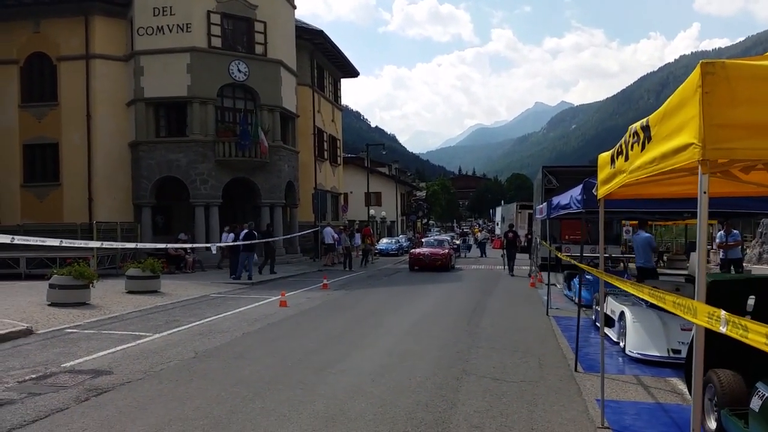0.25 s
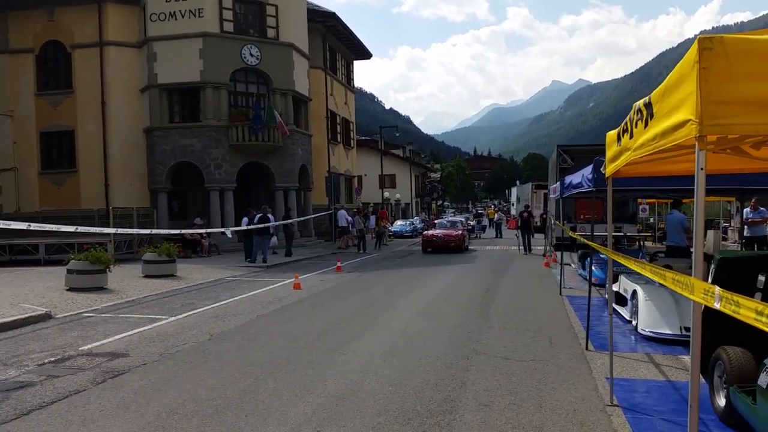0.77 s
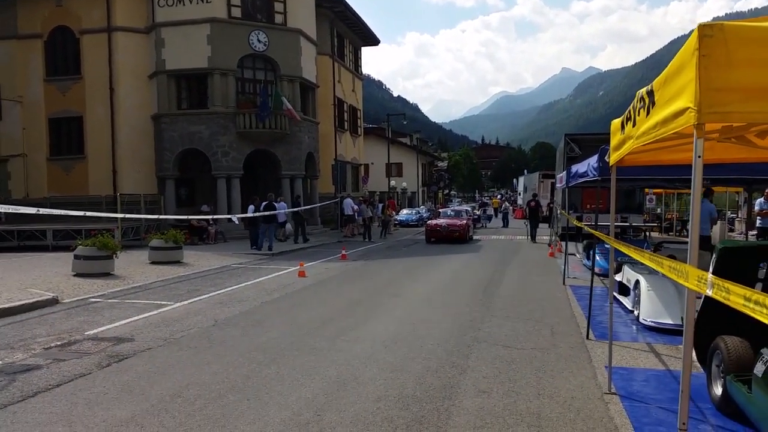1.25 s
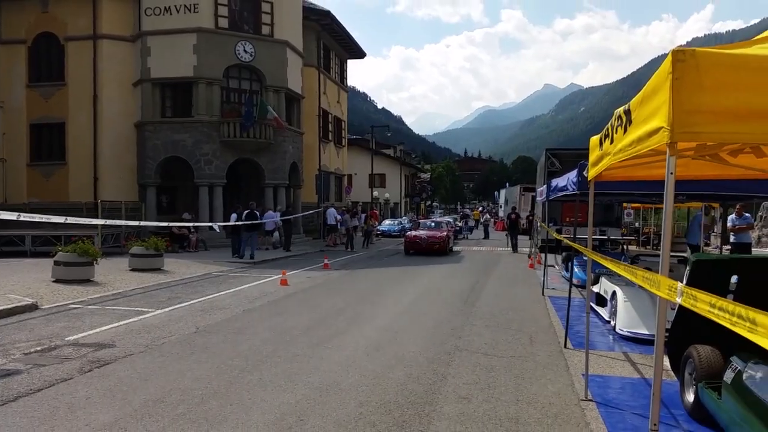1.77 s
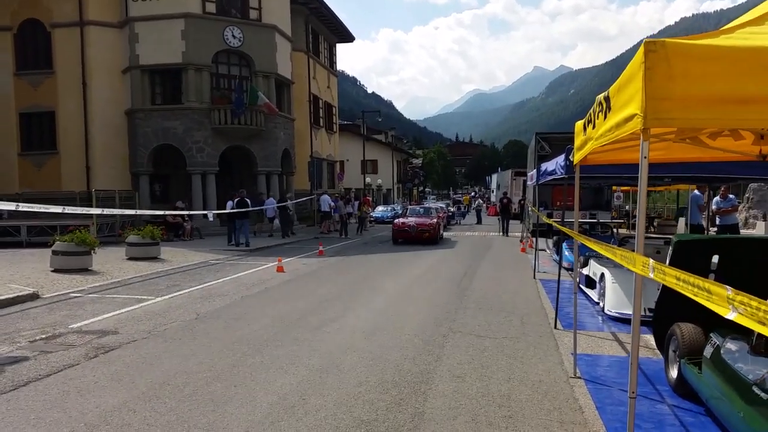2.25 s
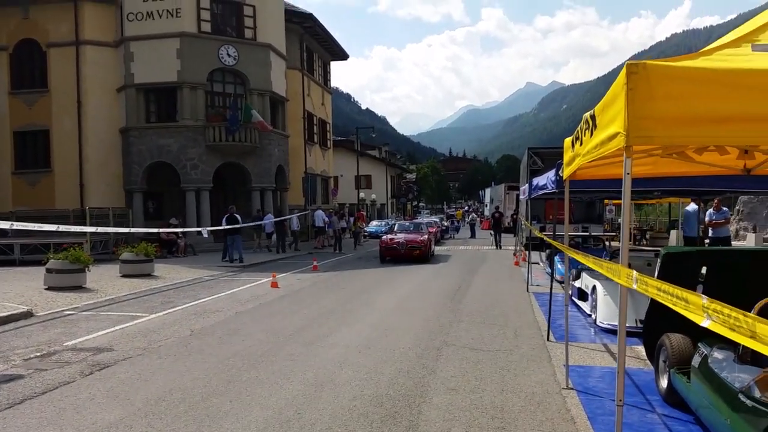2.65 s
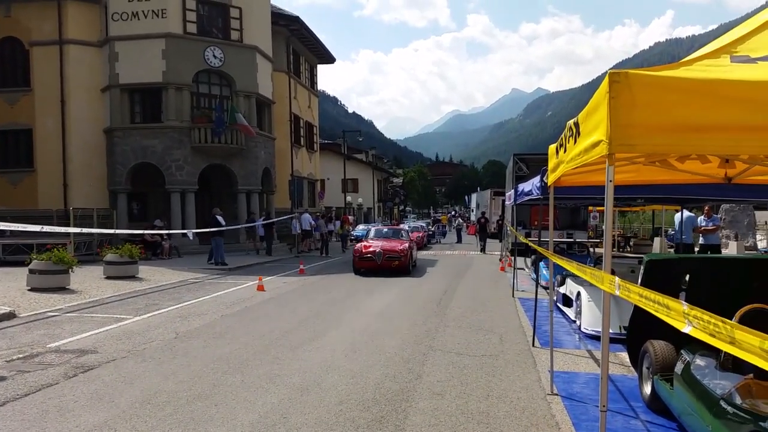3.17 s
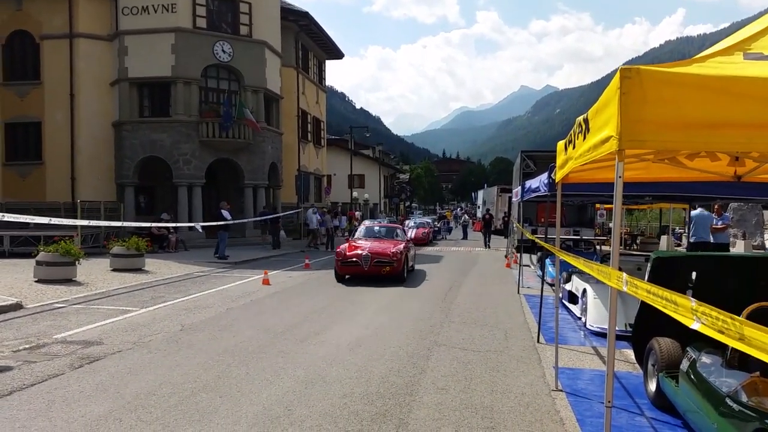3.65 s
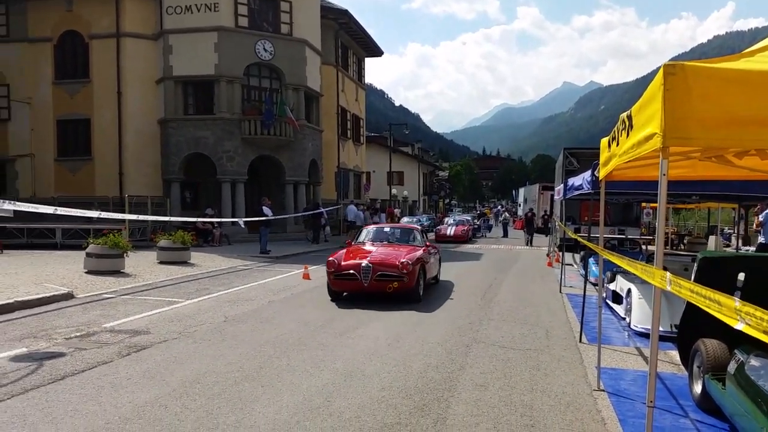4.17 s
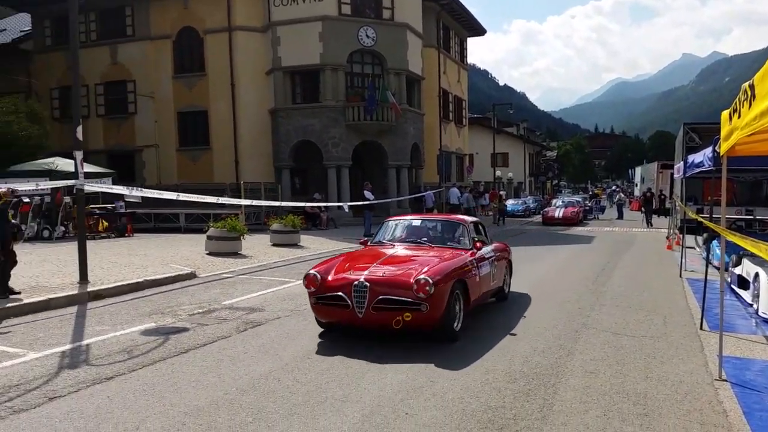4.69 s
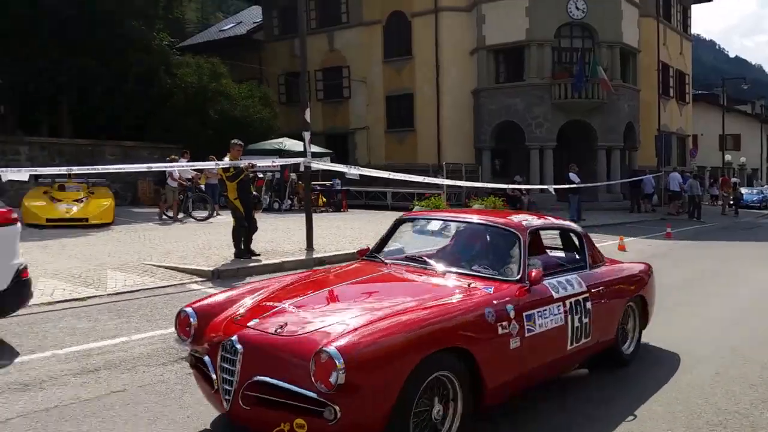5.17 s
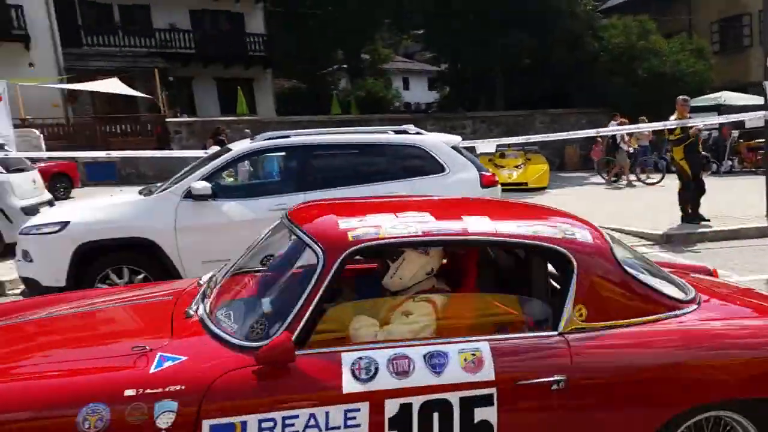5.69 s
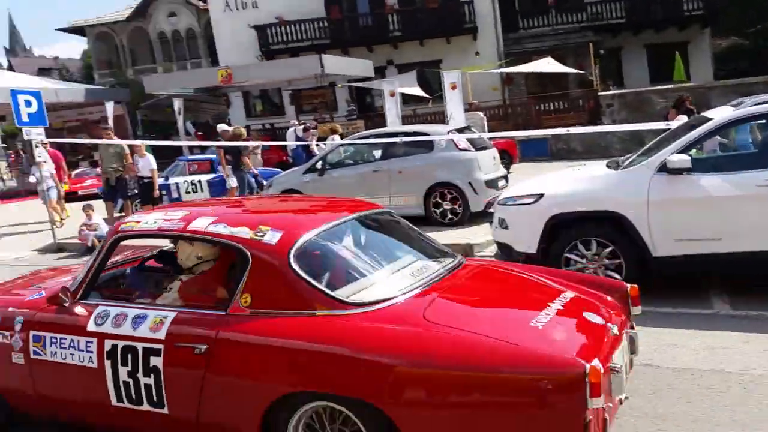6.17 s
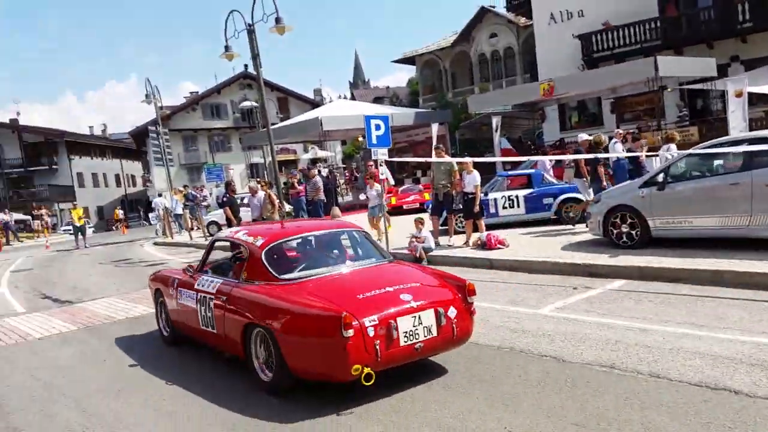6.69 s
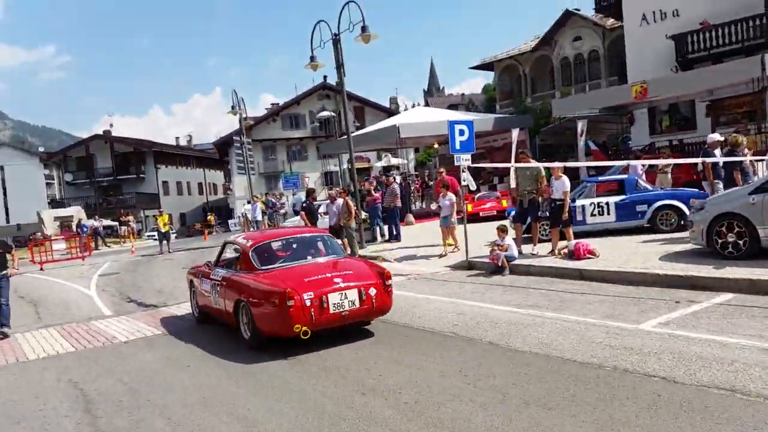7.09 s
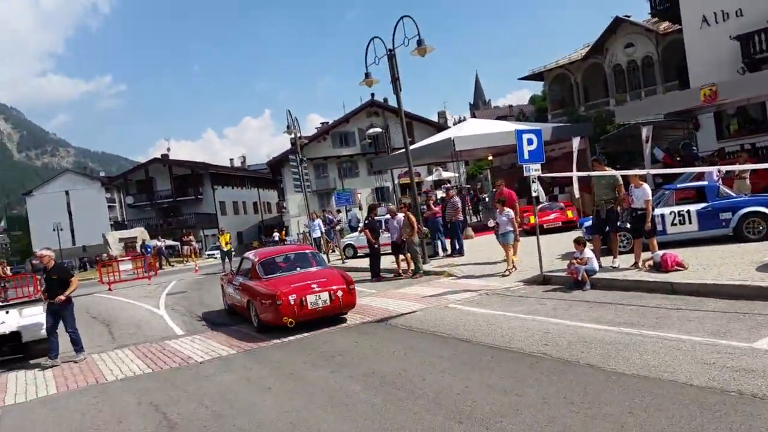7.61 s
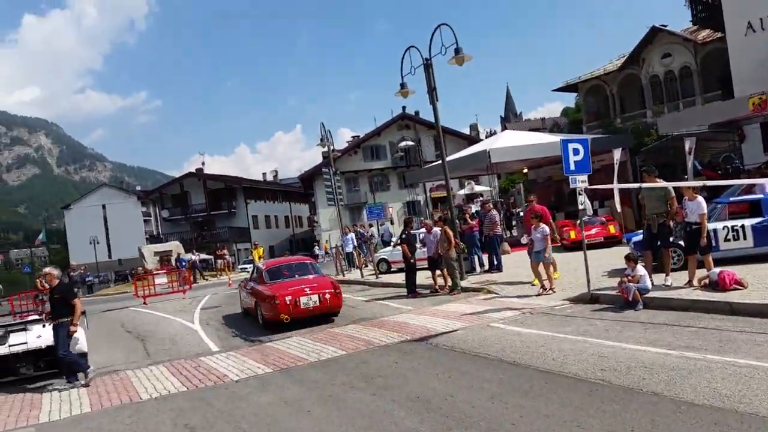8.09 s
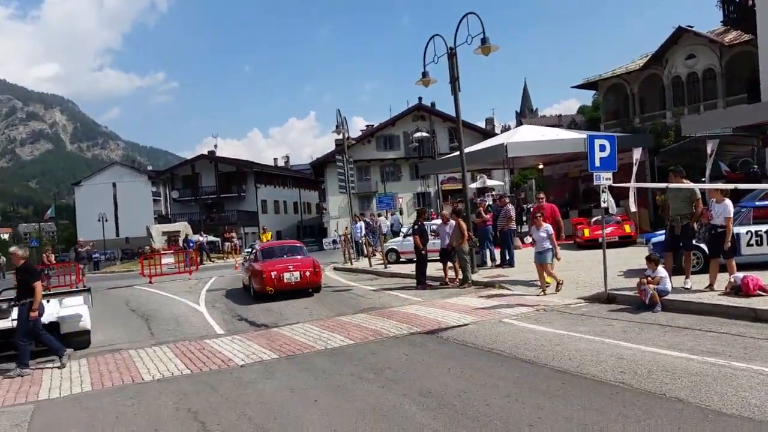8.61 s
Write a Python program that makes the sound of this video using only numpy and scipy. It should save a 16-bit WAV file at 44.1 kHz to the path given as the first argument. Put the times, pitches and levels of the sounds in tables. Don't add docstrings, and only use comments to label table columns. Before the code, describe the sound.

Lumpy engines rev up a village street, then a racing coupe revs twice, sweeps close past, blips and coasts off as brakes squeal briefly.

```python
import sys
import numpy as np
from scipy import signal
from scipy.fft import rfft, irfft, next_fast_len
from scipy.io import wavfile
from scipy.ndimage import uniform_filter1d

SR = 44100
rng = np.random.default_rng(int(sys.argv[2]) if len(sys.argv) > 2 else 0)


def log_audio(samples):
    frames = np.atleast_2d(samples).T
    limited = np.clip(frames, -1, 1)
    pcm = np.round(limited * 32767).astype(np.int16)
    wavfile.write(sys.argv[1], SR, pcm)


def attenuation_scalar(level_db):
    decades = np.asarray(level_db, float) / 20
    return 10 ** decades


N = 390285
TIME = np.arange(N) / SR
PADDED = next_fast_len(N + SR // 10)
FREQ = np.maximum(np.fft.rfftfreq(PADDED, 1 / SR), 1)

# time in seconds, cycle rate in Hz, level in dB,
# dulling in dB per octave of order.
QUEUE_EARLY = [
    (0.0, 21.12, -19.5, -6.5),
    (0.12, 21.43, -21, -3.5),
    (0.274, 21.96, -29, 0.5),
    (0.73, 28.27, -19.5, 3.5),
    (1.0, 28.18, -23.5, -2.5),
    (1.144, 26.39, -26, 2),
    (1.3, 27.77, -17.5, 0.5),
]
QUEUE_LATE = [
    (7.7, 26.18, -35.5, -1.5),
    (7.87, 24.94, -23, 0.5),
    (8.048, 24.45, -19.5, -2),
    (8.262, 26.6, -17, 2.5),
    (8.49, 29.11, -15, -0.5),
    (8.704, 29.7, -15, 3),
    (8.85, 28.8, -17, -3),
]
# multiple of the cycle rate, level in dB.
LUMPY_ORDERS = [(2, -13.5), (3, -4.5), (4, -1.5), (5, -8), (6, -4), (7, -14), (8, -5.5), (10, -9.5)]
SILENCER_HZ, SILENCER_DB_PER_HZ = 227, 0.5

# time in seconds, engine effort in dB, nearness of rolling cars in dB.
STREET = [(0, -28, -51.5), (.35, -29, -54), (.9, -26, -50), (1.5, -24, -49), (2.1, -25, -50.5),
          (2.75, -21.5, -51), (3.5, -24, -48), (4.2, -24.5, -46), (5.25, -30, -43), (5.9, -35.5, -47.5),
          (6.38, -37.5, -54), (6.7, -29.5, -61), (6.9, -34, -58.5), (7.45, -39.5, -67), (7.7, -37, -66.5),
          (8.2, -32, -62.5), (8.7, -29.5, -52.5), (8.85, -29, -51)]
# time in seconds, level in dB.
BURBLE_LEVEL = [(.5, -21), (.9, -18), (1.15, -20), (1.4, -24), (2.2, -23), (2.5, -18), (3.15, -18),
                (3.4, -23), (4.4, -28), (5.4, -29), (5.6, -18), (6.2, -22), (6.45, -29), (7.4, -33),
                (7.8, -28)]
# frequency in Hz, level in dB per Hz.
BURBLE_TONE = [(20, -25), (45, -10), (70, -2.5), (100, -4), (150, -3), (200, -4.5), (260, -14), (330, -39)]
GAS_TONE = [(200, 8.5), (260, -0.5), (320, 1.5), (390, -1.5), (490, -2.5), (560, -2.5), (650, -1),
            (760, -7.5), (900, -16.5), (1000, -30)]
CLATTER_TONE = [(800, -18.5), (920, -10.5), (1070, -0.5), (1200, -5), (1420, -11.5), (1650, -10),
                (1850, -10.5), (2150, -13), (2370, -14), (2560, -18), (2900, -21), (3300, -29.5)]
SHIELD_TONE = [(2180, -18), (2370, 0), (2560, -18)]
HISS_TONE = [(1650, -29.5), (2800, -9.5), (3570, -2), (3900, -2.5), (4820, -5.5), (6030, -4.5), (6880, -10),
             (9000, -29.5), (11700, -56), (19800, -120)]
AIR_TONE = [(5290, -43.5), (9000, -17), (9590, -8.5), (11900, 4.5), (14000, -3), (15100, -5.5), (15700, -9)]
# centre in seconds, swell in dB, half width in seconds.
ROARS = [
    (.915, 9, 0.025),
    (.64, 4.5, 0.035),
    (1.62, 3.5, 0.044),
    (3.67, 6.5, 0.026),
    (1.8, 0.5, 0.039),
    (5.62, 3, 0.11),
]
# start in seconds, level in dB over the hiss.
TICKS = [
    (1.213, 12.5),
    (2.389, 8.5),
    (5.97, 8),
    (6.055, 7),
    (8.71, 13),
]
# frequency in Hz, correlation from 0 to 1.
LIKENESS = [(60, 0.34), (300, 0.77), (700, 0.76), (1500, 0.34), (3000, 0.26), (6000, 0.2), (10000, 0.092),
            (13500, 0.27)]
CLATTER_EFFORT, CLATTER_NEAR, CLATTER_DB, AIR_DB = 0.58, 0.41, -1.1, -4.5
SHIELD_DB, SHIELD_ENDS_S = -19.5, 4.2
TICK_S, FAN_DB_PER_OCTAVE = 0.0044, 1.5
AIR_FULL_DB, AIR_LOSS = -47.5, 1.7
PASS_S, PASS_TURN_S, BAY_SHADOW_DB, AIR_SHADOW_DB = 5.6, 0.21, -0.5, -6

# time in seconds, firing rate in Hz.
COUPE_SPEED = [(0.85, 55.8), (1.0, 69.5), (1.15, 78.0), (1.75, 87.9), (2.05, 80.9), (2.65, 60.0),
               (3.1, 71.3), (4.15, 96.4), (4.45, 100.4), (4.9, 102.0), (5.35, 100.8), (5.65, 97.5),
               (6.33, 88.4), (6.5, 92), (6.79, 113.6), (7.15, 87.1), (7.6, 59.5), (7.75, 55.8)]
# time in seconds,
# level in dB, dulling in dB per octave of order, intake note in dB.
COUPE_HEARD = [(.95, -3.5, 2.5, -47.5), (1.3, -2, -9.5, -45), (1.6, -1, -0.5, -39), (2.0, -0.5, 0, -41.5),
               (2.6, -6.5, 1.5, -26), (3.0, -6, 0, -42), (3.5, -0.5, 1.5, -34), (4.12, 0, 0.5, -32),
               (4.33, 2.5, -9, -27.5), (4.65, 1, 1, -36.5), (5.3, -1.5, 3, -35), (5.75, 2, -5, -58.5),
               (6.35, 3, -13, -58), (6.55, 1, 2, -31.5), (6.78, -2, 5.5, -32), (6.9, -7, -3.5, -57),
               (7.2, 1, -11, -64), (7.75, -9, -16.5, -63.5)]
# multiple of the firing rate, level in dB.
STRONG = [(1, 1), (1.5, -12), (2, 0), (3, -2), (4, -3.5)]
# multiple of the firing rate, level in dB under the gas.
FAINT = [(2.5, -4.5), (3.5, -17), (4.5, -18.5), (5, -19.5), (5.5, -14), (7, -11.5), (7.5, -19), (8, -15.5),
         (8.5, -19.5), (9, -21.5), (10, -21.5), (9.5, -26.5), (11, -28.5)]
# multiple of the firing rate, level in dB over the nearness,
# level in dB gained (negative: lost) once the car has gone by.
WHINES = [(6.5, 12.5, -12.5), (10.5, 2.5, -6.5), (11.5, -3, -9.5)]
# frequency in Hz, level in dB.
TAILPIPE = [(55, -27.5), (80, -14.5), (100, -12.5), (150, -10), (195, -15), (240, -25), (300, -29),
            (420, -44)]
# frequency in Hz, level in dB.
BONNET = [(400, -1), (490, 4.5), (570, -6.5), (680, 0.5), (880, -5.5), (1040, -1.5), (1160, -1),
          (1280, -10)]
MISFIRE = 0.6
SMOOTH_DB, ROUGH_SPAN_DB = -31, 7
WHINE_RISE, WHINE_NEAR_DB = 1, -43

# start in seconds, length in seconds, pitch in Hz, level in dB.
DRONE = (1.19, .38, 318, -26)

# start in seconds, length in seconds, level in dB,
# cracks per second.
CRACKS = [
    (6.344, .45, -74.5, 220),
    (6.83, 0.24, -74.5, 60),
    (7.297, .65, -78.5, 35),
    (8.201, 0.19, -67, 44),
    (8.57, .3, -67.5, 45),
]
# frequency in Hz, level in dB per Hz.
CRACK_TONE = [(7000, -36.5), (9000, -22.0), (11000, -10.0), (13500, -11.5), (15000, 0.5), (16500, -3)]

# start in seconds, peak in dB, length in seconds.
GRABS = [
    (7.4, -41.5, 0.054),
    (7.455, -42, 0.035),
    (7.969, -41.5, 0.041),
    (8.065, -37, 0.035),
    (8.083, -35.5, 0.049),
    (8.424, -20, 0.046),
    (8.473, -43, 0.041),
]
# time in seconds, pitch in Hz, level in dB.
SQUEAK = [
    (8.45, 2510, -62),
    (8.548, 2536, -40),
    (8.636, 2516, -48.5),
    (8.696, 2444, -57),
    (8.7, 2480, -47),
]
DISC_HZ = 13680

# frequency in Hz, left minus right in dB.
PORT_BALANCE = [(60, 2.0), (110, 3), (200, 4), (380, 4.0), (700, 6.5), (1290, 3.5), (2380, 3.5), (4400, 7),
                (8120, 5), (15000, -7.5)]
LATE_LAG = 22


def curves(table):
    s, *columns = np.transpose(table)
    inside = 1. * ((TIME >= s[0]) & (TIME <= s[-1]))
    gate = uniform_filter1d(inside, SR // 20, mode="nearest")
    return [np.interp(TIME, s, c) for c in columns] + [gate]


def across(table):
    hz, value = np.transpose(table)
    return np.interp(np.log(FREQ), np.log(hz), value)


def unit(x):
    return x / np.sqrt(np.mean(x ** 2))


def filtered(x, gain):
    return irfft(rfft(x, PADDED) * gain, PADDED)[..., :N]


def colour(x, table):
    inside = (FREQ > table[0][0]) * (FREQ < table[-1][0])
    return unit(filtered(x, attenuation_scalar(across(table)) * inside))


def walk(rate, at=TIME):
    k = 8
    steps = np.repeat(rng.standard_normal(int(N / SR * rate) + 2), k)
    slewed = uniform_filter1d(uniform_filter1d(steps, k), k)
    return np.interp(at * rate * k, np.arange(len(steps)), unit(slewed))


def firings(turns, pattern_db, scatter_db, jitter):
    whole = np.arange(1, int(turns[-1]))
    chance = rng.standard_normal((N // 100, 2))[whole]
    at = np.clip(np.interp(whole + jitter * chance[:, 0], turns, np.arange(N)), 0, N - 2)
    size = attenuation_scalar(np.array(pattern_db)[whole % len(pattern_db)] + scatter_db * chance[:, 1])
    first = at.astype(int)
    part = at - first
    return np.bincount(first, size * (1 - part), N) + np.bincount(first + 1, size * part, N)


def tones(turns, orders, levels_db, phases, flicker_db, wobble):
    step = 10
    at = TIME[::step]
    angle = 2 * np.pi * (turns[::step] + wobble * walk(22, at))
    coarse = 0
    for k, db, phase in zip(orders, levels_db, phases):
        coarse = coarse + attenuation_scalar(db[::step] + flicker_db * walk(25, at)) * np.cos(k * angle + phase)
    return np.sqrt(2) * signal.resample_poly(coarse, step, 1)[:N]


def echo(x, t60_s):
    t = TIME[:SR // 2]
    tail = rng.standard_normal(len(t)) * np.exp(-np.log(1000) * t / t60_s)
    return signal.fftconvolve(x, tail / np.sqrt(np.sum(tail ** 2)))[:N]


def gone():
    return (1 + np.tanh((TIME - PASS_S) / PASS_TURN_S)) / 2


def swell(s, length_s):
    return np.sin(np.pi * np.clip((TIME - s) / length_s, 0, 1))


def lumpy(table):
    hz, level_db, dull_db, gate = curves(table)
    turns = np.cumsum(uniform_filter1d(hz, SR // 10)) / SR
    orders = np.array(LUMPY_ORDERS)[:, 0]
    pair = np.angle(1 + 0.8 * np.exp(-2j * np.pi * orders * 0.36))
    levels_db = []
    for k, db in LUMPY_ORDERS:
        silenced_db = SILENCER_DB_PER_HZ * np.maximum(k * hz - SILENCER_HZ, 0)
        levels_db.append(level_db + db + dull_db * np.log2(k / 4) + 2.1 * walk(11) - silenced_db)
    return gate * tones(turns, orders, levels_db, pair - np.pi / 4, flicker_db=0.6 * 2, wobble=0.003)


def street(turns):
    effort_db, near_db, _ = curves(STREET)
    passed = gone()
    air_near_db = np.minimum(near_db, AIR_FULL_DB)
    speed_octaves = np.log2(np.gradient(turns) * SR / 100)
    fan_db = FAN_DB_PER_OCTAVE * speed_octaves + AIR_LOSS * (air_near_db - AIR_FULL_DB)
    tick_db = sum(db * (TIME > s) * np.exp(-np.abs(TIME - s) / TICK_S) for s, db in TICKS)
    roar_db = sum(db * np.exp(-((TIME - s) / width_s) ** 4) for s, db, width_s in ROARS)

    idle = firings(np.cumsum(55 + 8 * walk(2)) / SR, [0, -3], scatter_db=3.5, jitter=0.299)
    burble = colour(echo(idle, 0.56), BURBLE_TONE) * attenuation_scalar(curves(BURBLE_LEVEL)[0])

    alike = np.clip(across(LIKENESS), 0, 1)
    common, *own = rng.standard_normal((3, N))
    beat = 1 + 0.11 * np.cos(2 * np.pi * turns) + 0.035 * np.cos(np.pi * turns)
    noise = beat * (filtered(common, np.sqrt(alike)) + filtered(own, np.sqrt(1 - alike)))

    gas = colour(noise, GAS_TONE) * attenuation_scalar(effort_db - 3.8 + 1.2 * walk(14) + roar_db)
    clatter_db = CLATTER_DB + CLATTER_EFFORT * effort_db + CLATTER_NEAR * near_db + BAY_SHADOW_DB * passed
    shield_db = SHIELD_DB + 3.0 * walk(5.6) - 8.9 * np.maximum(TIME - SHIELD_ENDS_S, 0)
    clatter = colour(noise, CLATTER_TONE) * attenuation_scalar(clatter_db + 1.1 * walk(15))
    clatter = clatter + colour(common, SHIELD_TONE) * attenuation_scalar(clatter_db + shield_db)
    clatter = clatter * attenuation_scalar(0.36 * roar_db)
    hiss = colour(noise, HISS_TONE) * attenuation_scalar(near_db + 0.79 * walk(9) + tick_db * (1 - passed))
    air_db = air_near_db + AIR_DB + AIR_SHADOW_DB * passed + fan_db * (1 - passed)
    air = colour(noise, AIR_TONE) * attenuation_scalar(air_db + 1.3 * walk(7.4) + tick_db)
    return burble + gas + clatter + hiss + air


def coupe():
    hz, gate = curves(COUPE_SPEED)
    turns = np.cumsum(uniform_filter1d(hz, SR // 12)) / SR
    level_db, dull_db, intake_db, _ = curves(COUPE_HEARD)
    effort_db, near_db, _ = curves(STREET)
    burble_db = curves(BURBLE_LEVEL)[0]
    pipe_hz, pipe_db = np.transpose(TAILPIPE)

    uneven_db = np.clip((burble_db - SMOOTH_DB) / ROUGH_SPAN_DB, 0.3, 2)
    strong_db = []
    for k, db in STRONG:
        passed_db = np.interp(np.log(k * hz), np.log(pipe_hz), pipe_db)
        dropout_db = (0.9 + 2.0 * np.log2(k)) * uneven_db * np.minimum(walk(10), 0.4)
        misfire_db = k % 1 * 2 * MISFIRE * (burble_db + 25)
        strong_db.append(level_db + db + dull_db * np.log2(k) + passed_db + dropout_db + misfire_db)

    whines_db = []
    for _, db, lost_db in WHINES:
        rolling_db = near_db + WHINE_RISE * (near_db - WHINE_NEAR_DB) + db + lost_db * gone()
        whines_db.append(np.maximum(rolling_db, intake_db + db - 20.5) + 2.2 * walk(12))

    orders = [*np.array(STRONG)[:, 0], 6, *np.array(WHINES)[:, 0]]
    levels_db = [*strong_db, intake_db + 2.5 * walk(6), *whines_db]
    phases = [np.pi, 1, np.pi, 2, 0, 1, 2, 0, 1]
    clear = tones(turns, orders, levels_db, phases, flicker_db=0.6, wobble=0.003)

    load_db = 0.71 * effort_db + 0.34 * (intake_db + 6.5)
    faint_db = [load_db + db + np.interp(k * hz, *np.transpose(BONNET)) for k, db in FAINT]
    faint_orders = np.array(FAINT)[:, 0]
    faint = tones(turns, faint_orders, faint_db, faint_orders ** 2, flicker_db=3.5, wobble=0.0071)
    fade_in = np.clip(2 * (TIME - COUPE_SPEED[0][0]), 0, 1)
    return gate * (clear + fade_in * faint), turns


def drone():
    s, length_s, hz, db = DRONE
    return attenuation_scalar(db + 2 * walk(20)) * swell(s, length_s) ** 0.5 * np.sin(2 * np.pi * hz * TIME)


def cracks():
    rate, gain = 1, 0
    for s, length_s, db, per_second in CRACKS:
        on = (TIME > s) & (TIME < s + length_s)
        rate = rate + on * per_second
        gain = gain + on * attenuation_scalar(db)
    ticks = firings(np.cumsum(rate) / SR + 1, [0], scatter_db=1.0, jitter=0.25)
    return uniform_filter1d(gain, SR // 15) * colour(ticks, CRACK_TONE)


def brakes():
    grabs = sum(attenuation_scalar(db) * swell(s, length_s) ** 2 for s, db, length_s in GRABS)
    squeal = grabs * np.sin(2 * np.pi * np.cumsum(DISC_HZ + 200 * walk(300)) / SR)
    resonance = 1 / (1 + ((FREQ - DISC_HZ - 60) / 350) ** 2)
    ring = filtered([echo(squeal, 0.33) for _ in range(2)], resonance)
    hz, squeak_db, gate = curves(SQUEAK)
    squeak = np.sin(2 * np.pi * np.cumsum(hz + 9 * walk(120)) / SR)
    squeak = gate * attenuation_scalar(squeak_db + 4.0 + 2.6 * walk(90)) * squeak
    return squeal * attenuation_scalar(np.array([[3], [0]])) + attenuation_scalar(3.0) * ring + squeak


def scene():
    car, turns = coupe()
    late = lumpy(QUEUE_LATE)
    engines = car + lumpy(QUEUE_EARLY) + drone()
    no_bass = np.clip(FREQ / 400, 0, 1)
    fronts = filtered([echo(engines + late, 0.72) for _ in range(2)], no_bass)
    late_right = np.roll(late, LATE_LAG) * (TIME > 1)
    ports = engines + [late, late_right] + attenuation_scalar(-17.0) * fronts
    ports = ports + street(turns) + brakes() + cracks()
    lean = attenuation_scalar(across(PORT_BALANCE) / 2)
    return filtered(ports, np.array([lean, 1 / lean]))


def top_cut(x):
    return signal.sosfilt(signal.butter(12, 15890, fs=SR, output="sos"), x)


def record(dry):
    ceiling = 1.08
    return top_cut(ceiling * np.tanh(dry / ceiling))


dry = scene()
out = record(dry)
log_audio(out)
```